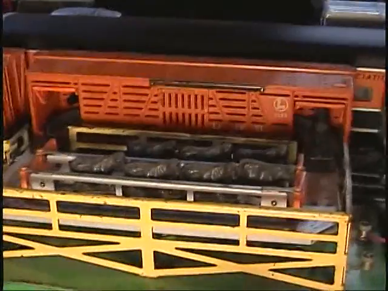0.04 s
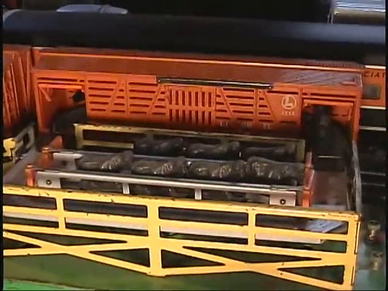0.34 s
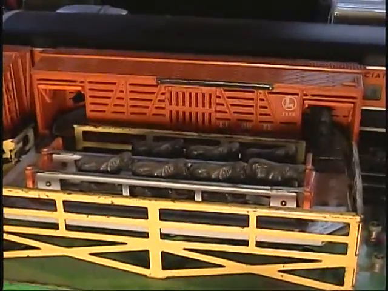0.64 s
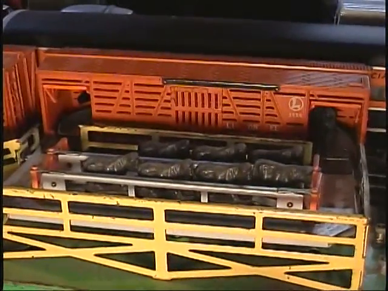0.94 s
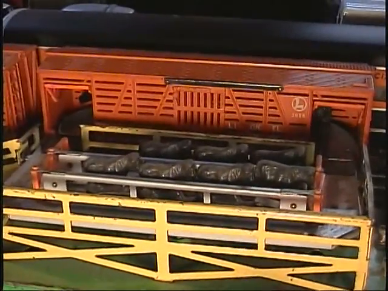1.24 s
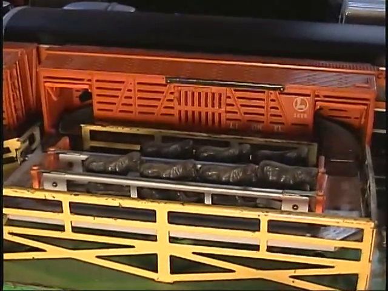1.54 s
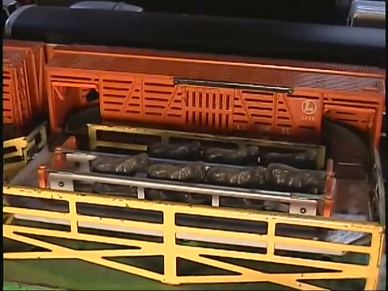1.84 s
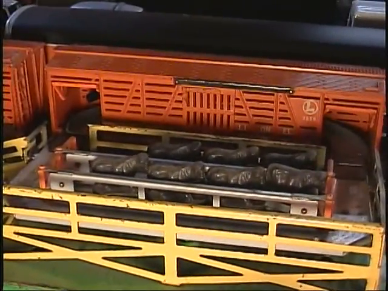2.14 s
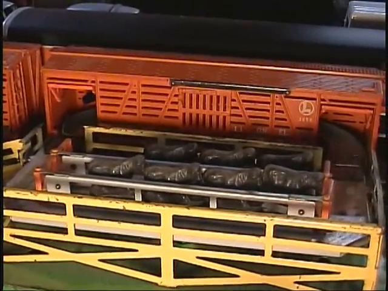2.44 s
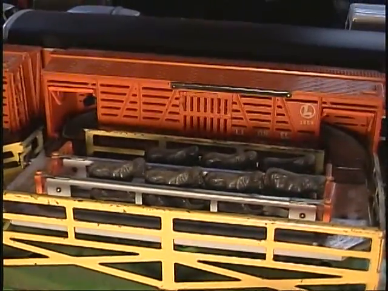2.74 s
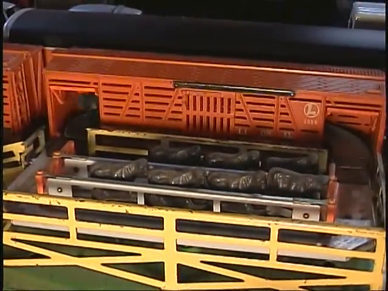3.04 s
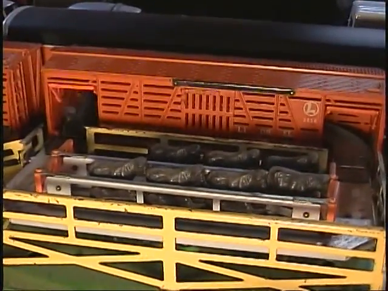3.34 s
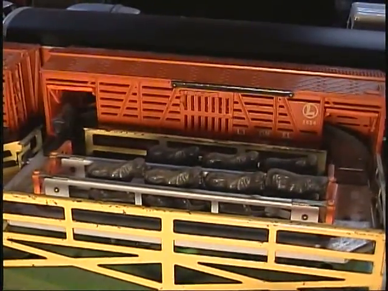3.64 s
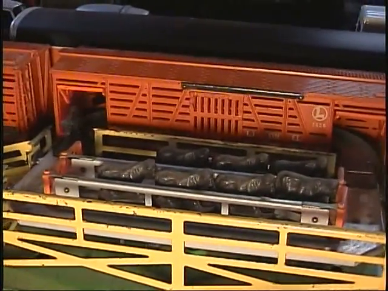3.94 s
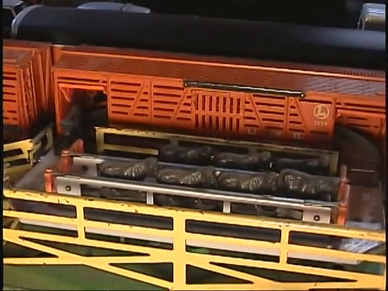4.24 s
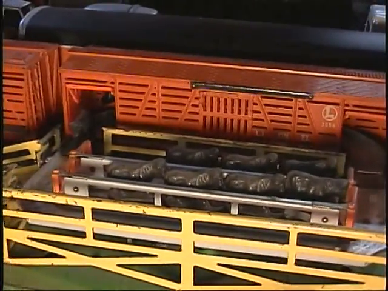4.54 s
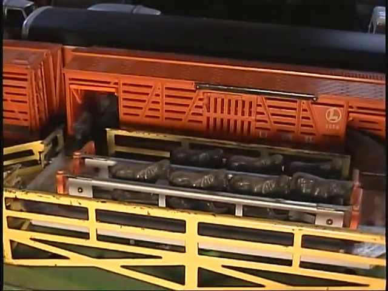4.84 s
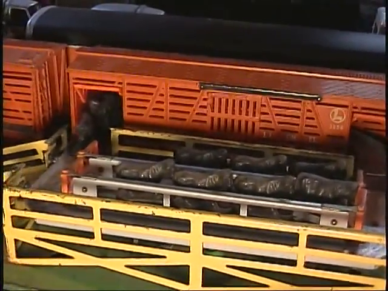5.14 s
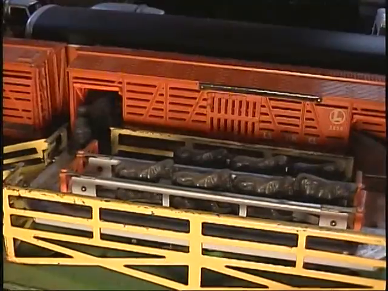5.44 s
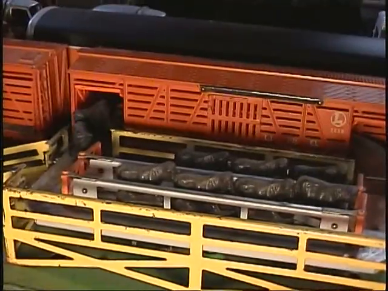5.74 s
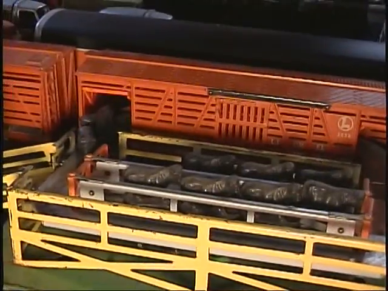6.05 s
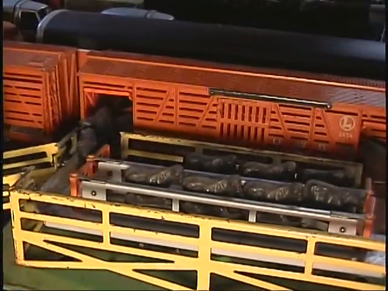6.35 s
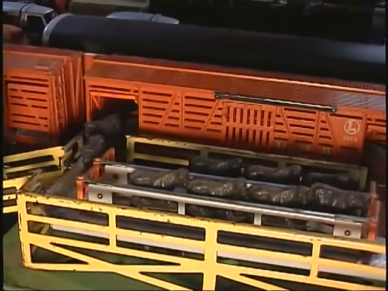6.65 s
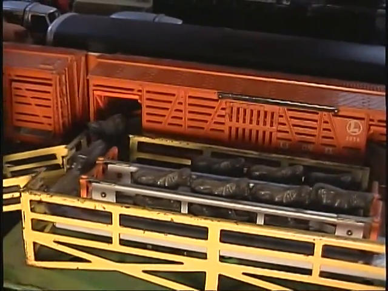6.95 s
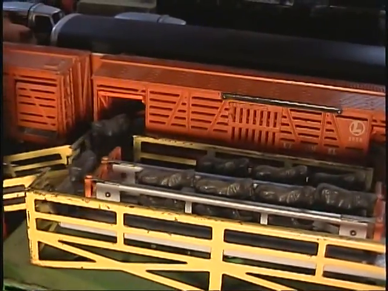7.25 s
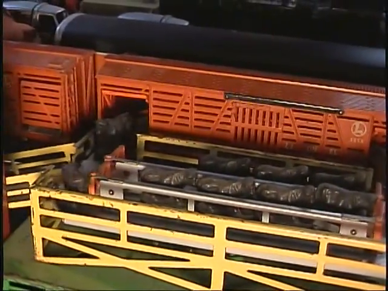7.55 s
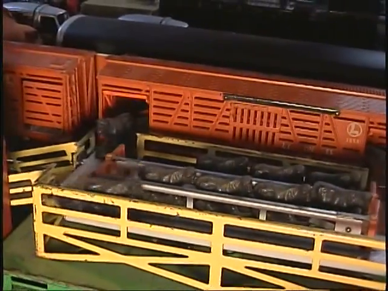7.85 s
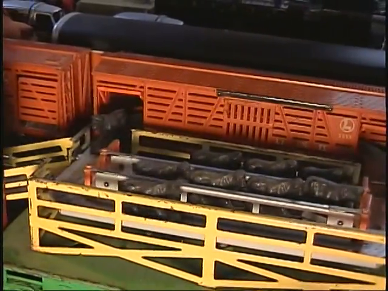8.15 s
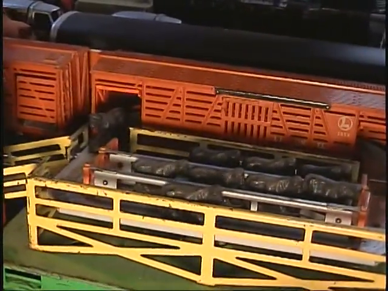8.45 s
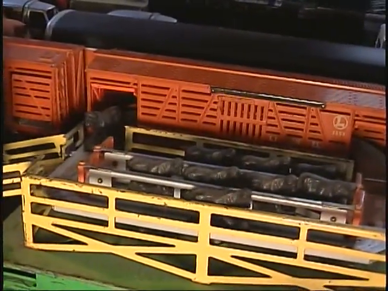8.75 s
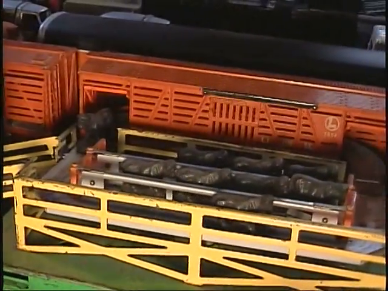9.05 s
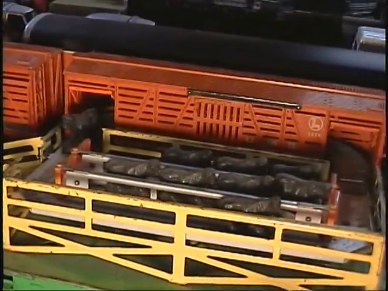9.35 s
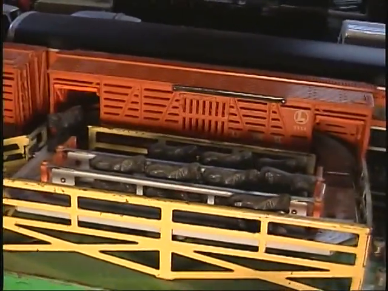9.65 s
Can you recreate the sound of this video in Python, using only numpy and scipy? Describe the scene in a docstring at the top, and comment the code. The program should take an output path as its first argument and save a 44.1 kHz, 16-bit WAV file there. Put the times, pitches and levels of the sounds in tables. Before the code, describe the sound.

A toy stockyard's sheet-metal platform buzzes and rattles from start to end, shaken very rapidly by an electric magnet. Small cattle figures and loose parts chatter on it, making a dense, bright, tinny sound whose high ringing notes slowly swell and fade. Underneath are a dull knocking from the base, soft table drumming, a faint electric hum and a very faint room rumble.

The rattle surges and catches briefly in the first second, then grows slightly, fullest around 3 to 4 seconds. It stutters just after 5 seconds with a small clack, and again near 6. At about 6.5 seconds it drops a little and turns thinner as the hum recedes, then gradually rebuilds. Light clacks stand out between 8 and 9.5 seconds. The toy sounds close and slightly left, in a quiet room with a short echo.

```python
"""A toy stockyard's sheet-metal platform rattles indoors, shaken 120 times a second by a mains magnet.
Loose parts and toy cattle hop on it and land in step, so the sheet and four loose strips ring and the
base thuds. The ring of the metal shifts as the cattle shuffle along. Under this dense rattle the table
drums, the magnet's coil hums and the room rumbles faintly. All of these sound from start to end."""
import sys
import numpy as np
from scipy import signal
from scipy.fft import rfft, irfft
from scipy.io import wavfile
from scipy.ndimage import uniform_filter1d

SR = 44100
rng = np.random.default_rng(int(sys.argv[2]) if len(sys.argv) > 2 else 0)


def put_to_file(sound):
    """Save the sound as 16-bit audio at rate SR, in the file named by the first command-line argument."""
    columns = np.atleast_2d(sound).T  # one column per channel
    safe = np.clip(columns, -1, 1)
    whole_steps = np.round(safe * 32767)
    wavfile.write(sys.argv[1], SR, whole_steps.astype(np.int16))


N = 432180
T = np.arange(N) / SR
SHAKE_HZ = 120  # the magnet pulls twice in each mains cycle

# strength of the rattle; it drops at once as the load lets go, then builds again: t/s, level/dB
RATTLE_LEVEL = [(0.0, -25), (0.5, -24), (1.1, -24.5), (2.1, -23.5), (3.3, -22.5), (4.3, -23), (5.2, -24),
                (6.44, -23.5), (6.5, -26.5), (7.5, -25), (8.4, -25), (9.8, -24)]
# brief surges and stalls as the cattle catch and slip: middle t/s, length/s, change/dB
JOLTS = [(0.12, 0.29, 1.7), (0.375, 0.048, -3), (0.705, .06, -2.5), (3.32, 0.11, 2), (3.67, 0.085, 1.5),
         (5.073, .06, 2), (5.11, 0.034, -3.5), (5.164, 0.032, -4.5), (5.978, 0.029, -4)]
# how hard the platform presses on its base as the cattle move along: t/s, load/dB
LOAD = [(0.0, 6), (0.7, -3), (1.5, -3.5), (2.6, 2.5), (3.25, 4), (3.8, -1), (4.6, 1.5), (5.05, 5), (6.0, 1),
        (6.42, 1.5), (6.55, -8), (7.5, -4.5), (9.8, -6.5)]
# the hardest landings: t/s, relative level/dB
CLACKS = [(0.1166, -11), (0.3917, -11), (1.293, -11), (4.6987, -11), (5.216, -8), (5.985, -12),
          (8.0252, -11), (8.4182, -9.5), (8.443, -11), (8.943, -10.5), (9.009, -12), (9.159, -10.5),
          (9.434, -11), (9.5246, -10)]
# notes at which the sheet metal rings: f/Hz, width/Hz, level/dB
SHEET_NOTES = [(2895, 110, -5.5), (3220, 160, -9), (3690, 240, -2.3), (4290, 120, -5.5), (4720, 180, -.7),
               (4980, 70, -4), (5465, 45, 2), (5720, 200, -2), (6085, 100, -2), (6380, 160, -4),
               (6740, 90, -4), (7420, 380, -2.5), (7880, 60, -1), (8850, 150, -4), (9130, 150, -1),
               (9540, 90, 0), (9800, 210, 0), (10530, 230, -1), (11130, 320, -4), (11620, 290, -2),
               (12300, 380, -1.5), (13520, 200, -3), (14230, 110, -1), (14680, 230, -1.5), (15120, 230, -4),
               (15950, 350, -5.5)]
# its crowded, overlapping notes in between: f/Hz, level/dB
SHEET_CLATTER = [(1000, -60), (2000, -20), (2700, -15.5), (3300, -11), (4400, -5), (5200, -9.5), (7000, -9),
                 (9000, -5.5), (12000, -15), (13200, -8), (16500, -11.5)]
# flat contacts ring the sheet's lower notes, hard edges its upper ones: f/Hz, level/dB
FLAT_TONE = [(20, 16), (6000, 0.5), (8000, -3.5), (11000, -12.5), (17000, -20)]
EDGE_TONE = [(20, -36), (5000, -18), (8000, -3.0), (11000, 0.5), (17000, 0.0)]
# the top treble, which opens up over the first seconds: t/s, level/dB
TREBLE_LEVEL = [(0.0, -3.5), (1.2, -1), (2.5, 0), (4.2, 1.5), (5.0, -0.5), (9.8, -1.2)]
# how much of that change each frequency gets: f/Hz, share
TREBLE_SHARE = [(11500, 0), (13300, 0.87)]
# ringing bands: "dull" and "upper" are broad bands of the sheet's ring near 3.3 and 7.4 kHz,
# the other four are loose strips; by name: f/Hz, width/Hz
BANDS = {"dull": (3350, 600), "low": (3980, 92), "middle": (5910, 165), "upper": (7450, 520),
         "high": (8620, 115), "top": (14080, 150)}
# the faint sound around a band: f/Hz, level/dB
BAND_FLOOR = [(20, -72), (20000, -58)]
# how strongly each band rings between swells, relative to the rattle, by name: level/dB
BAND_REST = {"dull": -30, "low": -12.8, "middle": -10, "upper": -28, "high": -22, "top": -25}
# spells in which a band swells and fades: name, loudest t/s, length/s, relative level/dB
BAND_SWELLS = [("dull", 0.089, 0.44, -12.5), ("dull", 3.16, 0.93, -13.5), ("low", 3.4, .5, -12),
               ("low", 6.6, 11, -13), ("middle", 8.7, 4.1, -6), ("upper", 1.6, 10.2, -12.5),
               ("high", 0.53, 1.6, -11), ("high", 1.77, 1.84, -9), ("high", 3.8, 1.3, -17),
               ("high", 7.7, 4.5, -17), ("top", 2.6, 1.0, -14), ("top", 4.06, 1.2, -11.5),
               ("top", 8.1, 6.8, -12)]
# notes of the whole platform and its base: f/Hz, width/Hz, level/dB
BASE_NOTES = [(1002, 76, -3), (1116, 135, -7), (1502, 95, 1.5), (1654, 240, 0.5), (1850, 166, 3),
              (2020, 83, 0.5), (2378, 92, 2), (2548, 83, -2.5)]
# the dull knock between them: f/Hz, level/dB
BASE_KNOCK = [(30, -45), (150, -26), (350, -19.5), (800, -10), (1250, -11), (1600, -10.5), (2300, -4.5),
              (3000, -26), (5000, -63), (16000, -83)]
# notes of the table under the toy: f/Hz, width/Hz, level/dB
TABLE_NOTES = [(178, 17, -0.5), (200, 18, -1.5), (226, 31, -1.5), (419, 19, -3.5), (546, 47, -8),
               (655, 43, -7)]
# the low thud between them: f/Hz, level/dB
TABLE_THUD = [(30, -37), (70, -20), (130, -10.5), (300, -6.5), (700, -11.5), (1200, -34.0), (16000, -70)]
# the coil's hum: multiple of the shaking rate, level/dB, change/dB for each dB of load
HUM_NOTES = [(1, -67.5, 1.2), (2, -60.5, 0.75), (3, -88, 2), (4, -75, 0.8), (5, -64.5, 0.5), (6, -82, -0.5)]
# tone of the room's rumble: f/Hz, level/dB
RUMBLE_TONE = [(20, 5), (60, 4), (120, -2), (300, -10), (1000, -42), (16000, -40)]
# how long the room's echo takes to fade by 60 dB: f/Hz, length/s
ECHO_FADE = [(200, 0.6), (2000, 1.6), (8000, 0), (16000, .8)]
# the echo, relative to the direct sound: f/Hz, level/dB
ECHO_LEVEL = [(60, 6), (120, 4), (200, -5.5), (350, 1.5), (800, -1.5), (1000, -8.5), (1300, -9),
              (1650, -17), (2400, -11), (3900, -18), (5200, -15), (9500, -11.5), (12000, -19), (16000, -27)]
# how much louder the left side is than the right: f/Hz, level/dB
LEFT_LEAN = [(60, -2), (130, -0.5), (330, 3.5), (750, 2), (1300, 1), (2500, -0.5), (5200, -0.5),
             (9000, 0.6), (13000, 0.9), (14500, 1.7)]


def amp(db):
    """Turns decibels into a gain to multiply by."""
    return 10 ** (np.asarray(db) / 20)


def unit(x):
    """Scales a signal to an average power of 1."""
    return x / np.sqrt(np.mean(x ** 2) + 1e-20)


def over_time(points, t=T):
    """Reads a time table, drawing straight lines between its rows."""
    return np.interp(t, *np.transpose(points))


def at_hz(points, hz):
    """Reads a frequency table, giving each octave equal room."""
    f, value = np.transpose(points)
    return np.interp(np.log(hz + 1), np.log(f + 1), value)


def wander(per_s):
    """A random drift of size about 1 that takes per_s new values a second."""
    values = rng.standard_normal(4096)
    return unit(np.interp(T * per_s, np.arange(len(values)), values))


def swell(middle_s, length_s):
    """A smooth arch of height 1 around a moment."""
    return np.cos(np.pi * np.clip((T - middle_s) / length_s, -.5, .5))


def steady(x, seconds):
    """Evens out the power over spans of this length and keeps the faster detail."""
    return x / np.sqrt(abs(uniform_filter1d(x ** 2, int(seconds * SR))) + 1e-12)


def tint(x, tone):
    """Turns each frequency up or down as a tone table says."""
    return irfft(rfft(x) * amp(at_hz(tone, np.fft.rfftfreq(N, 1 / SR))), N)


def ring(blows, notes, between, size=8192):
    """A struck object rings at its own notes, which stand on a smooth tone between them."""
    hz = np.fft.rfftfreq(size, 1 / SR)
    power = amp(at_hz(between, hz)) ** 2
    for f, width, db in notes:
        power += amp(db) ** 2 / (1 + 2 * ((hz - f) / width) ** 2) ** 2
    log_gain = np.log(np.r_[power, power[-2:0:-1]] + 1e-12) / 2
    spectrum = np.exp(np.conj(signal.hilbert(log_gain)))  # makes the ring come after the blow
    response = np.fft.ifft(spectrum).real
    return signal.oaconvolve(blows, response[:size // 2])[:N]


def landings(land_ms, scatter_ms, spread_db, recoil, stray_chance):
    """Energy of one part's landings: one on each upswing of the platform, a few out of step."""
    shakes = np.arange(int(N / SR * SHAKE_HZ) + 1)
    dice, offset = rng.random((2, len(shakes)))
    jitter, luck = rng.standard_normal((2, len(shakes)))
    # a hard landing throws the part up, so the next two are lighter
    force = unit(luck - recoil * np.roll(luck, 1) - 0.031 * np.roll(luck, 2))
    force_db = spread_db * np.minimum(force, 0.37 + force / 10)  # the magnet's stroke limits the blow
    shake_s = (shakes + offset * (dice < stray_chance)) / SHAKE_HZ
    land_s = shake_s + (land_ms + scatter_ms * jitter) / 1000
    samples = np.clip((land_s * SR).astype(int), 0, N - 1)
    energy = np.bincount(samples, amp(force_db) ** 2, N)
    return energy / energy.mean()


def platform_slaps(level):
    """The platform slaps its stops; before the hardest slaps it stays in the air for a shake."""
    energy = landings(land_ms=.25, scatter_ms=.3, spread_db=5.4, recoil=.36, stray_chance=.04)
    shake = SR // SHAKE_HZ
    for s, db in CLACKS:
        at = int(s * SR)
        energy[at - 3 * shake // 2:at + shake // 2] /= 4
        energy[at] += shake * (amp(db - 10) / level[at]) ** 2
    return energy


def hops(spread_db=5.5):
    """A small loose part hops on the platform in its own way."""
    return landings(land_ms=.6, scatter_ms=.7, spread_db=spread_db, recoil=0.6, stray_chance=0.13)


def chatter(energy, hold_s, fade_s):
    """Each landing snaps, then breaks into tiny bounces that quickly die away."""
    t = np.arange(SR // 25) / SR
    snap = 1.8 * np.exp(-t / 0.00015)
    bounces = np.exp(-np.maximum(t - hold_s, 0) / fade_s)
    shape = snap + bounces
    power = signal.oaconvolve(energy, shape / shape.sum())[:N]
    return np.sqrt(abs(power)) * rng.standard_normal(N)


def sheet_metal(slaps, load_db, hop_share=0.41):
    """Blows ring the sheet; pressed down, it gets more from flat contacts and less from hard edges."""
    flats = chatter(slaps + hop_share * (hops() + hops()), hold_s=.0012, fade_s=.0026)
    edges = chatter(slaps + hop_share * hops(), hold_s=.0012, fade_s=.0024)
    flats = unit(ring(steady(flats, 0.11), SHEET_NOTES, SHEET_CLATTER))
    edges = unit(ring(steady(edges, 0.11), SHEET_NOTES, SHEET_CLATTER))
    flat_gain = amp(-0.18 + 0.032 * load_db)
    edge_gain = amp(-2 - 0.073 * load_db)
    return flat_gain * tint(flats, FLAT_TONE) + edge_gain * tint(edges, EDGE_TONE)


def shifting_ring(metal, span_s=1.0, span_hz=330):
    """As the points of contact creep, groups of notes swell and fade, the high ones most."""
    hz, t, spectrum = signal.stft(metal, SR, nperseg=1024)
    patches = rng.standard_normal(spectrum.shape)
    for _ in range(2):  # blur over time and frequency
        patches = uniform_filter1d(patches, int(span_s / t[1]) + 1, axis=1)
        patches = uniform_filter1d(patches, int(span_hz / hz[1]) + 1, axis=0)
    drift_db = unit(patches) * np.sqrt(hz / hz.mean())[:, None]
    treble_db = at_hz(TREBLE_SHARE, hz)[:, None] * over_time(TREBLE_LEVEL, t)
    return signal.istft(spectrum * amp(treble_db + drift_db), SR, nperseg=1024)[1][:N]


def ringing_band(name, slaps, muting=0.25):
    """Each landing rings a loose strip or a broad band of the sheet; the ring dips once a shake."""
    hz, width = BANDS[name]
    energy = slaps * amp(4.4 * rng.standard_normal(N)) + .5 * hops(spread_db=16.0)
    blows = np.sqrt(energy) * rng.choice([-1, 1], N)
    ringing = ring(blows, [(hz, width, 0)], BAND_FLOOR)
    pressed = np.cos(np.pi * (SHAKE_HZ * T - .82)) ** 4
    power = amp(BAND_REST[name]) ** 2
    for which, s, length, db in BAND_SWELLS:
        if which == name:
            power = power + (amp(db) * swell(s, length)) ** 2
    return np.sqrt(power) * steady(ringing * (1 - muting * pressed), .4)


def base_thud(slaps, load_db):
    """Slaps and hops knock dully on the base, a little louder under load."""
    blows = chatter(slaps + 0.96 * (hops() + hops()), hold_s=0.0036, fade_s=0.012)
    return amp(-15 + 0.065 * load_db) * unit(ring(steady(blows, 0.097), BASE_NOTES, BASE_KNOCK))


def rattle(load_db, flutter_db=0.65):
    """Sheet, strips and base share the same slaps, and surge, stall and flutter together."""
    jolts_db = sum(db * swell(s, length) for s, length, db in JOLTS)
    level = amp(over_time(RATTLE_LEVEL) + jolts_db + flutter_db * wander(per_s=22))
    slaps = platform_slaps(level)
    metal = shifting_ring(sheet_metal(slaps, load_db))
    for name in BANDS:
        metal += ringing_band(name, slaps)
    return level * (metal + base_thud(slaps, load_db))


def table_drumming(load_db):
    """The table drums under the toy, more when the platform presses down."""
    thuds = chatter(hops(), hold_s=.002, fade_s=0.0044)
    drumming = ring(thuds, TABLE_NOTES, TABLE_THUD)
    return amp(-53.5 + 0.32 * load_db) * steady(drumming, 0.28)


def coil_hum(load_db, waver_rad=.25, waver_db=0.1):
    """The magnet's pulls make a hum, which grows with the load and wavers as the load shifts."""
    hum = np.zeros(N)
    for multiple, db, per_load in HUM_NOTES:
        gain = amp(db + per_load * load_db + waver_db * wander(per_s=4))
        cycles = multiple * SHAKE_HZ * T + rng.random()
        hum += gain * np.sqrt(2) * np.sin(2 * np.pi * cycles + waver_rad * wander(per_s=4))
    return hum


def room_rumble(level_db=-73):
    """The room's faint, low noise is mostly the same in both ears."""
    noise = rng.standard_normal((3, N))
    return amp(level_db) * unit(tint(noise[0] + .4 * noise[1:], RUMBLE_TONE))


def room_echo(direct):
    """The room adds a short echo for each ear; the lowest notes arrive mostly by reflection."""
    hz, t, spectrum = signal.stft(rng.standard_normal((2, SR // 2)), SR, nperseg=256)
    spectrum *= amp(-60 * t / at_hz(ECHO_FADE, hz)[:, None])
    spectrum *= t > .004  # reflections arrive a moment late
    spectrum /= np.sqrt(np.sum(abs(spectrum) ** 2, axis=2, keepdims=True))
    tail = signal.istft(spectrum, SR, nperseg=256)[1]
    tail /= np.linalg.norm(tail, axis=1, keepdims=True)
    echo = signal.fftconvolve(direct[None], tail, axes=1)[:, :N]
    keep_level = [(f, -10 * np.log10(1 + amp(db) ** 2)) for f, db in ECHO_LEVEL]
    return tint(direct + tint(echo, ECHO_LEVEL), keep_level)


def scene():
    """The toy rattles and hums in a quiet room, a little to the left."""
    load_db = over_time(LOAD)
    rumble = room_rumble()
    shaking = rattle(load_db) + table_drumming(load_db)
    left, right = room_echo(shaking) + coil_hum(load_db) + rumble
    left = tint(left, [(f, db / 2) for f, db in LEFT_LEAN])
    right = tint(right, [(f, -db / 2) for f, db in LEFT_LEAN])
    return np.array([left, right])


def notches(x, hz, depth_db, width_hz):
    """Cuts a narrow dip in the tone at every multiple of hz."""
    delay = np.exp(-2j * np.pi * np.fft.rfftfreq(N, 1 / SR) / hz)
    pole = np.exp(-np.pi * width_hz / hz)
    zero = 1 - (1 - pole) * amp(depth_db)
    comb = (1 - zero * delay) / (1 - pole * delay)
    return irfft(rfft(x) * comb * (1 + pole) / (1 + zero), N)


def record(dry, top_hz=16520):
    """Evenly spaced dips hollow the sound slightly, and the very highest treble is cut off."""
    hollow = notches(dry, hz=600, depth_db=-6, width_hz=48)
    hollow = notches(hollow, hz=300, depth_db=-2.5, width_hz=22)
    lowpass = signal.firwin(1023, top_hz, window=("kaiser", 9), fs=SR)
    return signal.oaconvolve(hollow, lowpass[None], "same")


dry = scene()
out = record(dry)
put_to_file(out)
```